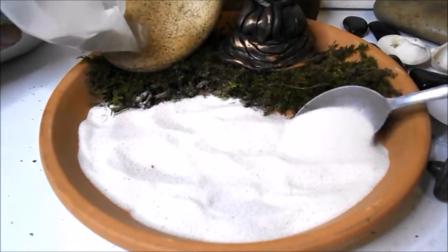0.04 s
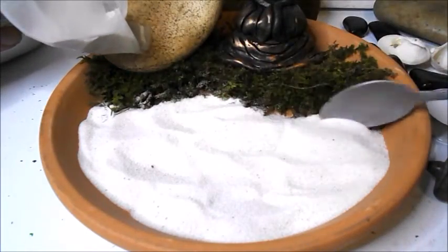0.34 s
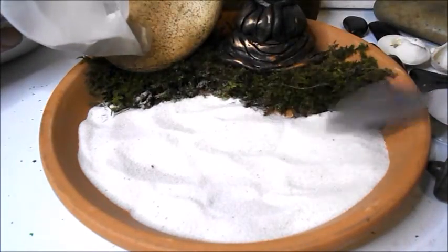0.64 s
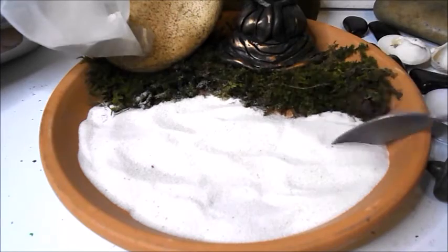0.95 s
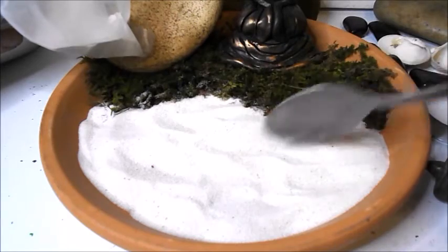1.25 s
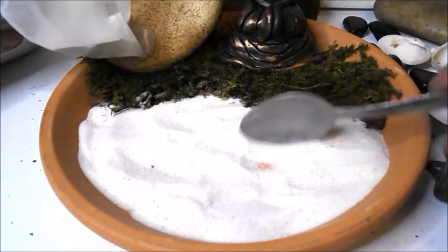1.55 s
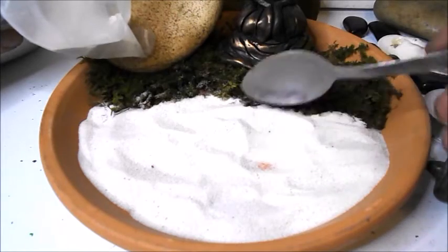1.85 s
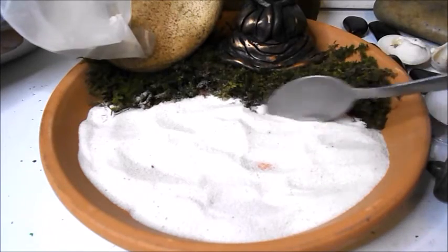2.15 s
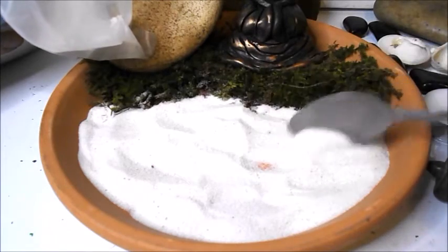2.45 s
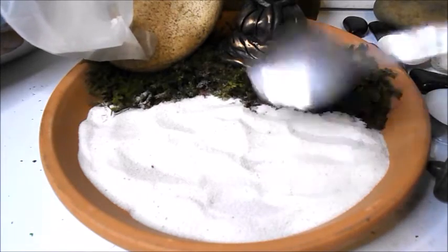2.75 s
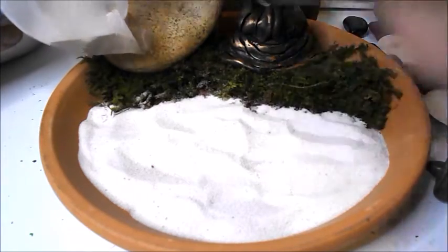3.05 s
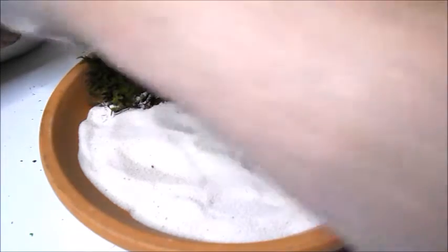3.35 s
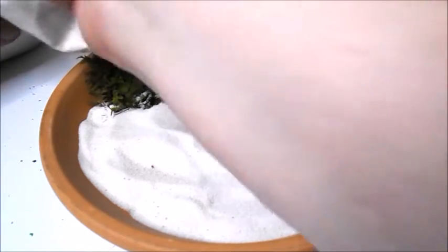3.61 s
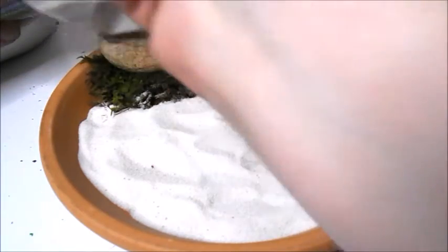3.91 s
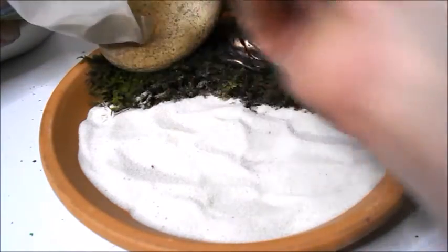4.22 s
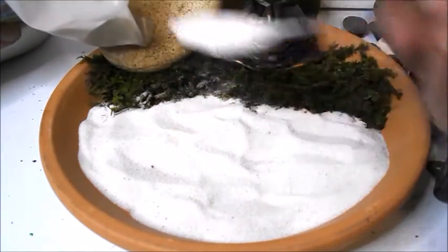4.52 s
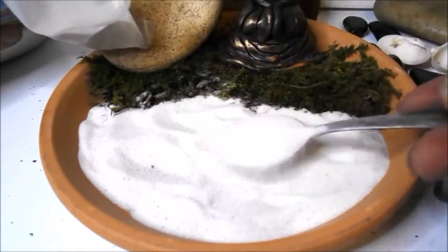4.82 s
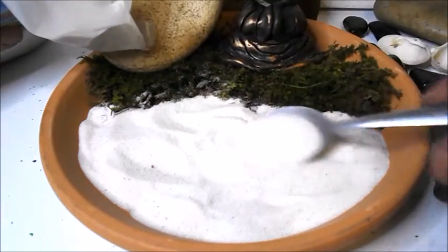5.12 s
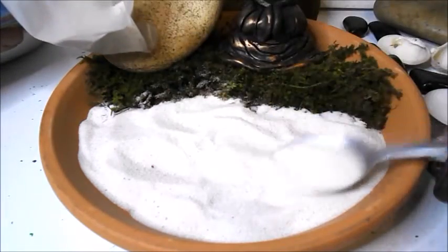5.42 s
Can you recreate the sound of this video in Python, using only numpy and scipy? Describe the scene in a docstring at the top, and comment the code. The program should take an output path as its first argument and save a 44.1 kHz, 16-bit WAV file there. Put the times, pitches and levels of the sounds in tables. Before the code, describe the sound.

Heard close up in a small, quiet room, a metal spoon drags over sand in a clay dish with a catching rasp. It taps the sand several times and clinks once on the rim. After a faint trickle, it pushes into a plastic bag, where packed grains crunch and creak while the plastic crackles. It ends with very soft spilling and rubbing as the spoon levels the heap.

```python
"""A steel spoon scrapes sand along a terracotta dish, clinks on the rim and pats the sand down.
Its edge sticks and slips over grit; each pat crushes grains and rings dish and steel.
It then digs into a plastic bag of sand: grains crunch and creak, creases snap, the hollow booms.
Back at the dish, loose grains slide off and the spoon smooths the heap.
Small quiet room, close mono microphone."""
import sys
import numpy as np
from scipy import signal
from scipy.io import wavfile
from scipy.ndimage import uniform_filter1d

SR = 44100
rng = np.random.default_rng(int(sys.argv[2]) if len(sys.argv) > 2 else 0)


def unload_audio(sound):
    """Save the sound as a 16-bit wav file, at the path given as the first command line argument."""
    columns = np.transpose(np.atleast_2d(sound))
    # keep every value between -1 and 1, then stretch to whole-number steps
    steps = np.round(np.clip(columns, -1, 1) * 32767)
    wavfile.write(sys.argv[1], SR, steps.astype(np.int16))


N = 245637
TIME_S = np.arange(N) / SR
BINS_HZ = np.fft.rfftfreq(4096, 1 / SR)

# room noise (frequency [Hz], level [dB])
AIR_SPECTRUM = [(25, -25), (55, -16), (100, -2), (180, -7.5), (245, -3), (300, -4), (385, -3.5),
                (530, -14.5), (730, -7.5), (1150, -17), (2200, -20.5), (4000, -21.5), (5600, -25.5),
                (11000, -39.5)]
# mains hum (frequency [Hz], level [dB])
HUM_TONES = [(61, -73), (120, -70.5)]
# drift of the lower hum tone (time [s], gain [dB])
HUM_DRIFT = [(0, 6), (.8, 7.5), (1.2, 4.5), (3, -6), (5.57, 1)]
# reverberation (frequency [Hz], t60 [s])
ROOM_DECAY = [(250, 0.28), (1000, 0.24), (3000, 0.19), (9000, 0.12)]
# brief level dips (start [s], length [s], depth [dB])
LEVEL_DIPS = [(1.1, 0.075, 12.5), (3.898, 0.04, 5)]
# gaps in the treble (frequency [Hz], width [Hz])
TREBLE_NOTCHES = [(7000, 1410), (8500, 1500), (10000, 620)]

# sand spills off the spoon (start [s], length [s], level [dB])
SAND_SPILLS = [(.47, 0.13, -63.5), (.63, 0.096, -62.5), (2.24, .1, -66), (2.64, 0.075, -64),
               (2.98, 0.34, -59), (4.64, 0.095, -64.5), (4.82, .03, -68), (4.99, 0.055, -62.5),
               (5.28, 0.23, -64)]
# stray grains land (time [s], level [dB])
GRAIN_TICKS = [(2.9922, -39.5), (3.0577, -41), (3.081, -42.5), (3.2907, -37.5)]
# falling grains (frequency [Hz], level [dB])
SPILL_SPECTRUM = [(800, 0), (2000, 1), (3200, -2), (4300, 2), (5500, 4), (7500, -2), (11000, -12.5)]
# spoon smooths the heap (start [s], length [s], level [dB])
SMOOTH_STROKES = [(5.03, 0.14, -66), (5.17, 0.29, -60), (5.47, .03, -61)]
# spoon and dish while smoothing (frequency [Hz], width [Hz], level [dB])
HEAP_RESONANCES = [(1010, 61, 6), (1490, 81, -5), (2110, 140, -3), (3500, 550, -7), (4300, 490, -2)]

# bag creases snap (time [s], level [dB], centre [Hz])
BAG_SNAPS = [(3.3509, -8.5, 3380), (3.4118, -21, 3900), (3.513, -10.5, 3600), (3.5707, -17, 3900),
             (3.578, -15.5, 2610), (3.602, -15.5, 2430), (3.6437, -7.5, 3050), (3.658, -9.5, 3570),
             (3.6655, -20, 3400), (3.689, -13.5, 1490), (3.7133, -9.5, 4300), (3.7263, -13.5, 3240),
             (3.8994, -7.5, 5330), (3.946, -26.5, 3200), (4.154, -15.5, 3860), (4.1753, -19, 4070)]
# plastic film (frequency [Hz], level [dB])
FILM_SPECTRUM = [(60, -54), (200, 4.5), (1500, 8), (2300, 8), (5000, 7.5), (7500, 0), (11000, -17)]
# packed grains creak on steel (start [s], length [s], initial pitch [Hz], level [dB])
SAND_CREAKS = [(3.378, 0.026, 5290, -30), (3.454, 0.02, 4770, -29), (3.522, 0.029, 4060, -28),
               (3.71, .025, 4350, -31.5)]
# digging effort: in, pause, out (time [s], level [dB])
DIG_EFFORT = [(3.324, -27.5), (3.36, -28), (3.39, -24), (3.47, -27.5), (3.5, -31.5), (3.62, -33.5),
              (3.72, -28), (3.79, -36), (3.895, -37.5), (3.92, -44), (3.955, -36.5), (4.19, -30),
              (4.275, -32), (4.31, -41), (4.53, -35.5), (4.57, -47), (4.62, -44.5), (4.67, -63)]
# burial of the spoon (time [s], depth [0-1])
DIG_DEPTH = [(3.32, 0.2), (3.67, 0.93), (4.27, 0.45), (4.33, .06), (4.62, 0)]
# crunch deep in the sand (frequency [Hz], level [dB])
PACKED_SPECTRUM = [(500, -29), (1100, -3), (1400, -8), (1850, -4), (2300, 6), (2750, 0.5), (3800, 5),
                   (5000, -0.5), (6000, 1), (7600, -12), (11000, -27)]
# crunch near the surface (frequency [Hz], level [dB])
LOOSE_SPECTRUM = [(1000, -31), (2500, -13.5), (3000, -2), (4100, 0.5), (5200, 0), (6300, -4), (7600, -9.5),
                  (9300, -13), (11000, -17.5)]
# shifting bulk of sand (frequency [Hz], level [dB])
BULK_SPECTRUM = [(50, -40), (110, -19), (165, -3), (205, -2.5), (245, 2), (310, -4), (390, 6), (520, -9.5),
                 (700, 5.5), (930, -1), (1120, -12), (1450, -1), (2200, -21)]
# buried spoon (frequency [Hz], width [Hz], level [dB])
SHANK_RESONANCES = [(1990, 70, 0.5), (2315, 90, 2), (3720, 110, 1), (4300, 140, 3), (5130, 140, -4)]
# hollow of the bag (frequency [Hz], width [Hz], level [dB])
HOLLOW_RESONANCES = [(744, 120, -5), (882, 42, 1), (2300, 350, -6)]
# sand gives way at once (start [s], length [s], bulk level [dB], boom level [dB])
SAND_HEAVES = [(3.362, 0.056, -33.5, -50), (3.449, 0.013, -33, -36), (3.579, 0.034, -33.5, -36.5),
               (3.678, 0.058, -40, -40.5), (4.037, 0.024, -38.5, -49), (4.165, 0.029, -50, -45),
               (4.201, 0.1, -61, -45.5), (4.391, 0.13, -53.5, -51), (4.509, 0.025, -52, -40.5)]

# spoon's bowl rasps on clay (start [s], length [s], level [dB])
RASP_STROKES = [(0, 0.016, -39), (.034, 0.016, -44), (.061, 0.022, -35.5), (1.619, 0.0067, -35.5),
                (1.849, 0.019, -45), (2.518, 0.018, -38.5)]
# bowl flat on clay (frequency [Hz], width [Hz], level [dB])
FLAT_RESONANCES = [(826, 350, 6.5), (1260, 130, 9.5), (1837, 47, 17.5), (2680, 730, 4.5), (4600, 870, 4.5),
                   (5800, 500, 2), (7700, 520, -10), (10500, 1200, -54)]
# spoon's edge pushes through grit (start [s], length [s], level [dB])
SCRAPE_STROKES = [(.1, 0.039, -45), (.134, 0.1, -33.5), (.322, 0.12, -44.5), (.398, 0.052, -42)]
# edge catches and slips hard (time [s], level [dB])
HARD_SLIPS = [(0.12, -23), (0.138, -19.5), (0.149, -17), (0.185, -24.5), (0.21, -15), (.277, -28),
              (0.292, -27.5), (.376, -28.5), (.399, -22.5), (0.452, -30), (.464, -27.5)]
# edge on clay (frequency [Hz], width [Hz], level [dB])
EDGE_RESONANCES = [(1063, 20, 3), (1390, 320, -4), (1750, 120, -8), (2730, 310, -11.5), (3390, 220, -0.5),
                   (4256, 230, 3), (5170, 400, -12), (6340, 900, -14), (9200, 270, -19)]
# spoon pats the sandy dish (time [s], level [dB], centre [Hz], width [octaves],
# steel ring [dB], first bounce gap [s], first bounce loss [dB])
SPOON_PATS = [(0.8927, -8.5, 2810, 0.9, -7.5, 0.0061, 12.5), (1.610, -9, 1810, .5, -19.5, .016, 3.5),
              (1.8451, -22, 1280, 0.65, -10, 0.006, 3.5), (1.8615, -29, 1430, 2.2, -15, .017, 1.5),
              (2.508, -20.5, 1450, 1.9, -0.5, .0217, 0.3), (2.966, -40.5, 1060, 0.19, -36, .02, 20)]
# crushed grit (frequency [Hz], level [dB])
CRUSH_SPECTRUM = [(80, -5), (250, 1), (600, -1), (1200, -3.5), (3000, -1.5), (5000, -6), (6500, -7),
                  (9000, -25), (11500, -16)]
# grains cracking under steel (frequency [Hz], level [dB])
FIZZ_SPECTRUM = [(3000, -32), (6000, -12), (7700, 12.5), (9400, 0.5), (11000, -10)]
# sand-damped dish (frequency [Hz], level [dB], t60 [s])
DISH_MODES = [(900, -6.5, 0.018), (1016, -2.5, 0.057), (1200, 2.5, 0.024), (1403, 6.5, 0.018),
              (1652, -2, 0.022), (2100, -2, 0.016), (2352, -25, 0.012), (2710, -2.5, 0.026),
              (2886, 8, 0.016), (3240, -18, 0.042)]
# spoon pressed into sand (frequency [Hz], level [dB], t60 [s])
PRESSED_SPOON_MODES = [(2746, -5, 0.024), (3445, -7, 0.031), (4300, -0.5, 0.027), (4670, 0, 0.013),
                       (4910, -2, 0.017), (5340, -20, .05), (6100, -18, 0.04), (7370, -19, 0.027)]
# spoon strikes the rim (time [s], level [dB])
RIM_CLINKS = [(1.0939, -6.5)]
# clink's tick and diffuse decay (frequency [Hz], level [dB])
CLINK_SPECTRUM = [(200, -15.5), (700, -11), (1200, -7.5), (2000, -2.5), (3400, 2.5), (4800, 0.5),
                  (6200, -17), (8000, -30), (11000, -29.5)]
# free spoon, some modes in beating pairs (frequency [Hz], level [dB], t60 [s])
FREE_SPOON_MODES = [(716, -18, .35), (1615, -17, .3), (2645, -5, .29), (3580, -9, .26), (3655, -10, .26),
                    (3678, -.5, .31), (4805, -10, .33), (4848, -5.5, .32), (6035, -13, .29),
                    (7490, -23, .28), (8920, -33, .27), (10620, -36, .25)]


def amp(db):
    """Decibels to gain."""
    return 10 ** (np.asarray(db) / 20)


def unit_rms(x):
    """Scales to rms 1."""
    return x / np.sqrt(np.mean(x ** 2) + 1e-20)


def peaked(x, db):
    """Scales a hit so its strongest millisecond crests at db."""
    return x * amp(db) / np.sqrt(2 * uniform_filter1d(x ** 2, SR // 1000).max())


def curve(table, hz=BINS_HZ):
    """Interpolates a table over log frequency."""
    table_hz, values = np.transpose(table)
    return np.interp(np.log(hz + 1), np.log(table_hz + 1), values)


def envelope(table):
    """Gain along a (time [s], level [dB]) curve, silent outside it."""
    return amp(np.interp(TIME_S, *np.transpose(table), left=-150, right=-150))


def strokes(table, attack_s, release_s):
    """Gain of strokes that rise, hold and decay."""
    gain = np.zeros(N)
    for start_s, length_s, db in table:
        rise = np.clip((TIME_S - start_s) / attack_s, 0, 1)
        fall = np.exp(-np.clip((TIME_S - start_s - length_s) / release_s, 0, 20))
        gain += amp(db) * rise * fall
    return gain


def add(mix, start_s, sound):
    """Mixes a sound in at start_s."""
    part = mix[max(round(start_s * SR), 0):][:len(sound)]
    part += sound[:len(part)]


def colour(x, gain_db):
    """Minimum-phase filter, gain given at BINS_HZ."""
    log_gain = np.log(amp(np.maximum(gain_db, -100)))
    mirrored = np.concatenate([log_gain, log_gain[-2:0:-1]])
    taps = np.fft.ifft(np.exp(np.conj(signal.hilbert(mirrored)))).real
    return signal.fftconvolve(x, taps[:len(BINS_HZ)])[:len(x)]


def hump(hz, octaves, depth_db):
    """Broad peak in dB: 0 at hz, -depth_db far off."""
    return depth_db * (np.exp(-.5 * (np.log2((BINS_HZ + 1) / hz) / octaves) ** 2) - 1)


def resonances(table):
    """Power sum of resonances, in dB."""
    power = sum(amp(db) ** 2 / (1 + (2 * (BINS_HZ - hz) / width_hz) ** 2) for hz, width_hz, db in table)
    return 10 * np.log10(power)


def ring(modes, t):
    """One decaying sine per mode, random phase."""
    return sum(amp(db - 60 * t / t60_s) * np.sin(2 * np.pi * (hz * t + rng.random()))
               for hz, db, t60_s in modes)


def burst(t, decay_s, lag_s=0.00065, rise_s=0.00038):
    """Run of tiny fractures that builds and dies."""
    age_s = np.maximum(t - lag_s, 0)
    return rng.choice([-1., 1.], len(t)) * (1 - np.exp(-age_s / rise_s)) * np.exp(-age_s / decay_s)


def grains(per_s, spread_db):
    """Random clicks, most small, a few large."""
    size = amp(spread_db * np.minimum(rng.exponential(1, N), 4))
    return unit_rms(size * rng.choice([-1., 1.], N) * (rng.random(N) < per_s / SR))


def clumps(rate_hz, depth_db):
    """Gain wandering as grains jam and give way."""
    knots = rng.standard_normal(N)
    return unit_rms(amp(depth_db * np.interp(TIME_S * rate_hz, np.arange(N), knots)))


def rub(pressure, body):
    """Fine grit rubs a resonant body."""
    friction = rng.standard_normal(N) * clumps(250, depth_db=3)
    return pressure * unit_rms(colour(friction, resonances(body)))


def air(noise_db=-57.5, low_cut_hz=60):
    """Steady room noise, faint mains hum."""
    noise = unit_rms(colour(rng.standard_normal(N), curve(AIR_SPECTRUM)))
    noise = signal.sosfilt(signal.butter(1, low_cut_hz, "high", fs=SR, output="sos"), noise)
    low_hum, high_hum = (amp(db) * unit_rms(np.sin(2 * np.pi * hz * TIME_S)) for hz, db in HUM_TONES)
    return amp(noise_db) * noise + low_hum * envelope(HUM_DRIFT) + high_hum


def room(x, predelay_s=0.0032, echoes_per_s=3000):
    """Sparse reflections; treble dies first."""
    t = np.arange(SR // 2) / SR
    echoes = rng.choice([-1., 1.], len(t)) * (rng.random(len(t)) < echoes_per_s / SR) * (t > predelay_s)
    hz, frame_s, spectra = signal.stft(echoes, SR, nperseg=256)
    decay = amp(-60 * frame_s / curve(ROOM_DECAY, hz)[:, None])
    tail = signal.istft(spectra * decay, SR, nperseg=256)[1]
    return signal.fftconvolve(x, tail / np.linalg.norm(tail))[:N]


def trickle(spill_db=-1, tick_db=-3):
    """Loose grains slide onto the heap; a few land alone."""
    t = np.arange(SR // 50) / SR
    sand_db = curve(SPILL_SPECTRUM)
    falling = unit_rms(colour(grains(1500, spread_db=4.5), sand_db))
    out = amp(spill_db) * strokes(SAND_SPILLS, attack_s=0.015, release_s=0.018) * falling
    for start_s, db in GRAIN_TICKS:
        tick = colour(burst(t, decay_s=0.0013), sand_db)
        add(out, start_s, peaked(tick, db + tick_db))
    return out


def smoothing():
    """Spoon rubs lightly over the heap."""
    return rub(strokes(SMOOTH_STROKES, attack_s=0.038, release_s=0.021), HEAP_RESONANCES)


def bag(crease_hz=3550, crease_s=0.00098, crease_octaves=0.68, crinkle_db=-12, snap_db=-2):
    """Plastic creases flip: small ones follow the dig; bigger ones snap lower, longer, broader."""
    t = np.arange(SR // 30) / SR
    film_db = curve(FILM_SPECTRUM)
    flips = abs(grains(80, spread_db=0.7))
    crinkle = signal.fftconvolve(flips, abs(burst(t, decay_s=0.00066)))[:N] * rng.standard_normal(N)
    crinkle = colour(crinkle, film_db + hump(crease_hz, crease_octaves, depth_db=15))
    out = amp(crinkle_db) * envelope(DIG_EFFORT) * unit_rms(crinkle)
    for start_s, db, hz in BAG_SNAPS:
        size = (crease_hz / hz) ** 1.38
        snap = colour(burst(t, crease_s * size), film_db + hump(hz, crease_octaves * size, depth_db=15.5))
        add(out, start_s, peaked(snap, db + snap_db))
    return out


def creak(width_hz=350, sag_hz_per_s=3600):
    """Packed grains squeak on steel, pitch sinking as the spoon goes in."""
    out = np.zeros(N)
    lowpass = signal.butter(2, width_hz / 2, fs=SR, output="sos")
    flutter = signal.sosfilt(lowpass, rng.standard_normal((2, N)))
    for start_s, length_s, hz, db in SAND_CREAKS:
        pitch_hz = hz - sag_hz_per_s * np.clip(TIME_S - start_s, 0, 2 * length_s)
        carrier = np.exp(2j * np.pi * np.cumsum(pitch_hz) / SR)
        squeak = unit_rms((carrier * (flutter[0] + 1j * flutter[1])).real)
        out += strokes([(start_s, length_s, db)], attack_s=0.0061, release_s=0.0078) * squeak
    return out


def dig(crunch_db=-1.5, shank_db=-8, heave_db=-1, bulk_db=-19.5, deep_boost_db=12, hollow_db=-20):
    """Grains grind past the spoon, duller when deep; the bulk shifts, the bag booms."""
    effort = envelope(DIG_EFFORT)
    depth = np.interp(TIME_S, *np.transpose(DIG_DEPTH))
    jam = clumps(150, depth_db=2.5)
    packed = unit_rms(colour(grains(3000, spread_db=3) * jam, curve(PACKED_SPECTRUM)))
    loose = unit_rms(colour(grains(4500, spread_db=2.5) * jam, curve(LOOSE_SPECTRUM)))
    shank = unit_rms(colour(grains(500, spread_db=2.5) * jam, resonances(SHANK_RESONANCES)))
    crunch = np.sqrt(depth) * (packed + amp(shank_db) * shank) + np.sqrt(1 - depth) * loose
    shifting = grains(1800, spread_db=2.5) * jam * clumps(60, depth_db=3.5)
    bulk = unit_rms(colour(shifting, curve(BULK_SPECTRUM)))
    heaves = np.array(SAND_HEAVES)
    heave = amp(heave_db) * strokes(heaves[:, :3], attack_s=0.012, release_s=0.0098)
    boom = strokes(heaves[:, [0, 1, 3]], attack_s=0.0069, release_s=0.0071)
    push = np.hypot(heave, effort * amp(bulk_db + deep_boost_db * depth))
    hollow = rub(np.hypot(boom, amp(hollow_db) * effort), HOLLOW_RESONANCES)
    return amp(crunch_db) * effort * crunch + push * bulk + hollow


def rasp():
    """Spoon's bowl rubs grit flat on the clay."""
    return rub(strokes(RASP_STROKES, attack_s=0.0024, release_s=0.014), FLAT_RESONANCES)


def scrape(slips_per_s=120, jitter=0.4, uneven_db=3, hiss_db=-6, stroke_db=-1, slip_db=-3):
    """Edge sticks and slips over grit; each slip rings spoon and dish."""
    t = np.arange(SR // 20) / SR
    edge_db = resonances(EDGE_RESONANCES)
    wander = unit_rms(uniform_filter1d(rng.standard_normal(N), size=300))
    slip_count = np.floor(np.cumsum(slips_per_s * np.exp(jitter * wander)) / SR)
    slips = np.diff(slip_count, prepend=0) * amp(uneven_db * rng.standard_normal(N))
    chatter = signal.fftconvolve(slips, abs(burst(t, decay_s=0.0016)))[:N] * rng.standard_normal(N)
    friction = unit_rms(chatter) + amp(hiss_db) * rng.standard_normal(N)
    pressure = amp(stroke_db) * strokes(SCRAPE_STROKES, attack_s=0.0015, release_s=0.0061)
    out = pressure * unit_rms(colour(friction, edge_db))
    for start_s, db in HARD_SLIPS:
        slip = colour(burst(t, decay_s=0.0031), edge_db + hump(hz=3980, octaves=0.98, depth_db=8.5))
        add(out, start_s, peaked(slip, db + slip_db))
    return out


def contact(hz, octaves, steel_db, fizz_db, crush_db=7, dish_db=-8, lag_s=0.00061):
    """One touch crushes grit, rings dish and spoon."""
    t = np.arange(SR // 8) / SR
    onset = np.clip(t / lag_s - 1, 0, 1)
    grit = amp(crush_db) * colour(burst(t, decay_s=0.0025), curve(CRUSH_SPECTRUM))
    dish = amp(dish_db) * onset * ring(DISH_MODES, t)
    blow = colour(grit + dish, hump(hz, octaves, depth_db=15.5))
    steel = onset * ring(PRESSED_SPOON_MODES, t)
    fizz = colour(burst(t, decay_s=0.0015), curve(FIZZ_SPECTRUM))
    return peaked(blow, 0) + peaked(steel, steel_db) + peaked(fizz, fizz_db)


def pats(trim_db=-2, gap_ratio=0.51, pitch_ratio=1.05, steel_step_db=7.5):
    """Spoon lands and bounces twice: each bounce sooner, weaker, higher, more steely."""
    out = np.zeros(N)
    for start_s, db, hz, octaves, steel_db, gap_s, loss_db in SPOON_PATS:
        fizz_db = -19 - 0.36 * db  # softer pat, larger share of fizz
        for bounce in range(3):
            touch = contact(hz * pitch_ratio ** bounce, octaves, steel_db + bounce * steel_step_db, fizz_db)
            add(out, start_s, peaked(touch, db + trim_db - loss_db * bounce ** 2))
            start_s += gap_s * gap_ratio ** bounce
    return out


def clinks(tick_db=-0.36, thud_db=-9, thud_s=0.001, haze_db=-23, haze_t60_s=0.41, ring_db=-14):
    """Bare steel on clay: hard tick, low push on the dish; the spoon rings on in a diffuse decay."""
    out = np.zeros(N)
    t = np.arange(SR // 2) / SR
    clink_db = curve(CLINK_SPECTRUM)
    for start_s, db in RIM_CLINKS:
        impact = burst(t, decay_s=0.0009, lag_s=0.0001, rise_s=0.0001)
        tick = peaked(colour(impact, clink_db + hump(hz=7900, octaves=0.33, depth_db=13)), tick_db)
        push = (1 - t / thud_s) * np.exp(-t / thud_s)
        thud = amp(thud_db) * colour(push, hump(hz=300, octaves=1, depth_db=9))
        noise = unit_rms(colour(rng.standard_normal(len(t)), clink_db))
        haze = amp(haze_db - 60 * t / haze_t60_s) * noise
        steel = amp(ring_db) * ring(FREE_SPOON_MODES, t)
        add(out, start_s, amp(db) * (tick + thud + haze + steel))
    return out


def scene():
    """Spoon, dish and bag in the room; both channels alike."""
    hits = pats() + clinks()
    digging = dig() + creak() + bag()
    rubs = rasp() + smoothing() + scrape() + trickle()
    reverb = room(amp(-15) * hits + amp(-14) * rubs + amp(-19) * digging)
    return np.tile(hits + rubs + digging + reverb + air(), (2, 1))


def record(dry, fall_share=0.14, recovery_s=0.013, top_hz=11100):
    """Two brief level dips, treble notches, band limit."""
    out = dry
    for start_s, length_s, depth_db in LEVEL_DIPS:
        onset = np.clip((TIME_S - start_s) / (fall_share * length_s), 0, 1)
        release = np.clip((start_s + length_s - TIME_S) / recovery_s, 0, 1)
        out = out * amp(-depth_db * onset * release)
    for hz, width_hz in TREBLE_NOTCHES:
        out = signal.lfilter(*signal.iirnotch(hz, hz / width_hz, SR), out)
    lowpass = signal.firwin(201, top_hz, window=("kaiser", 8), fs=SR)
    return signal.oaconvolve(out, lowpass[None], "same")


dry = scene()
out = record(dry)
unload_audio(out)
```